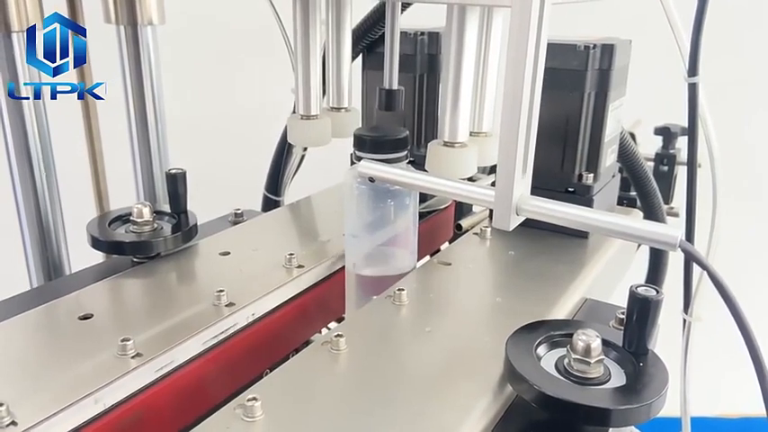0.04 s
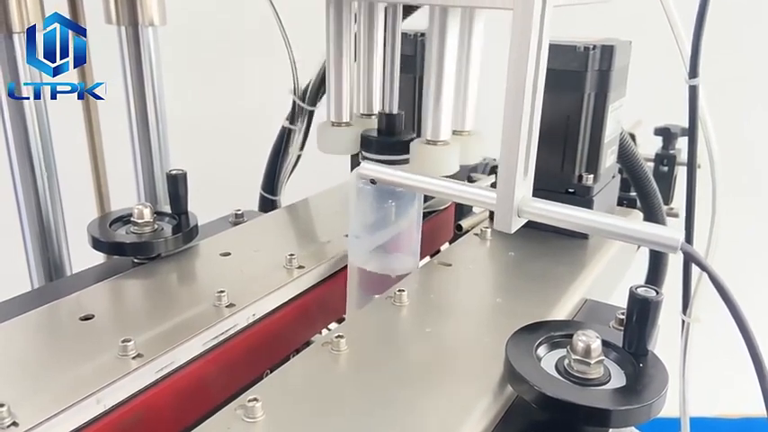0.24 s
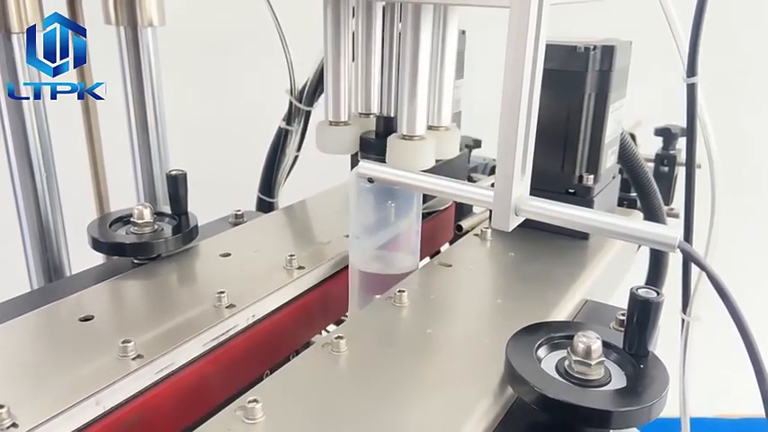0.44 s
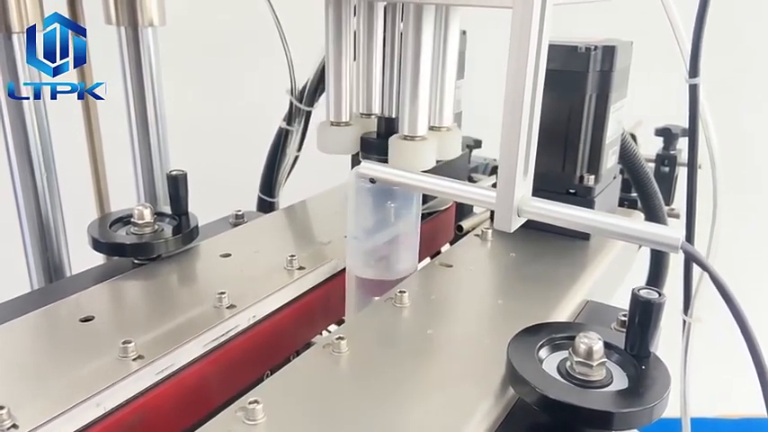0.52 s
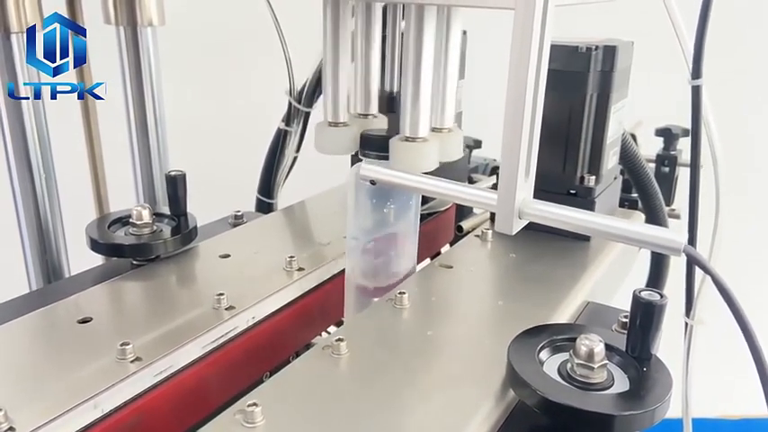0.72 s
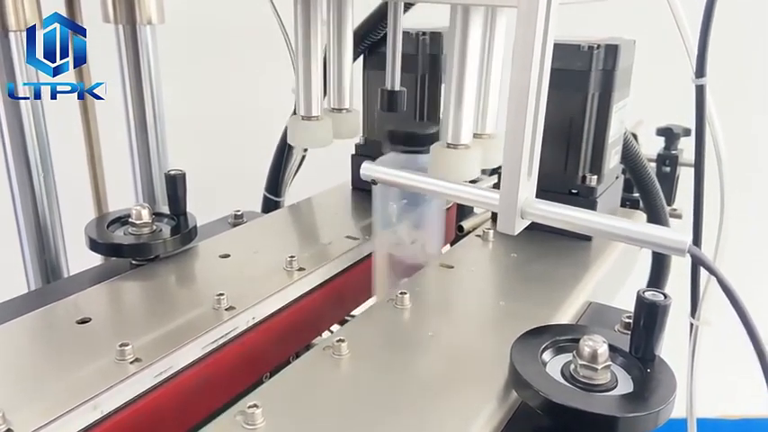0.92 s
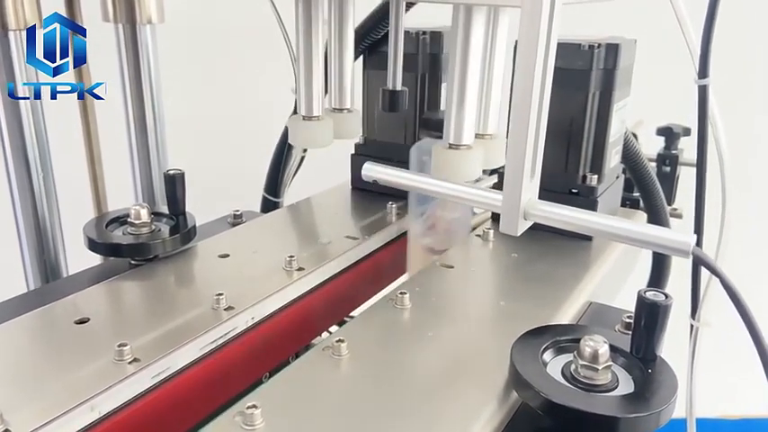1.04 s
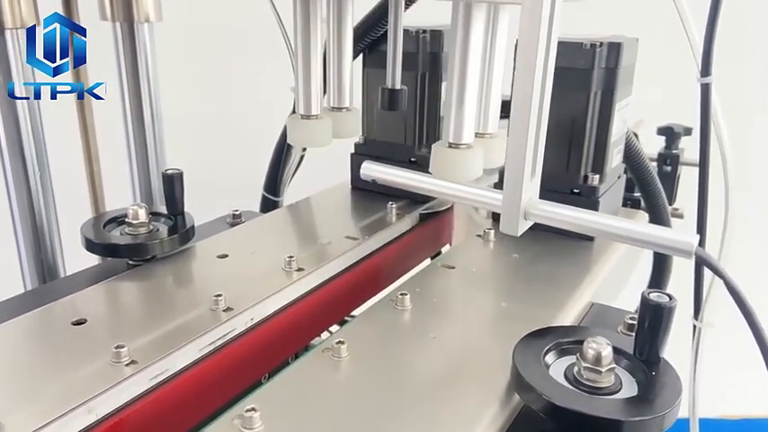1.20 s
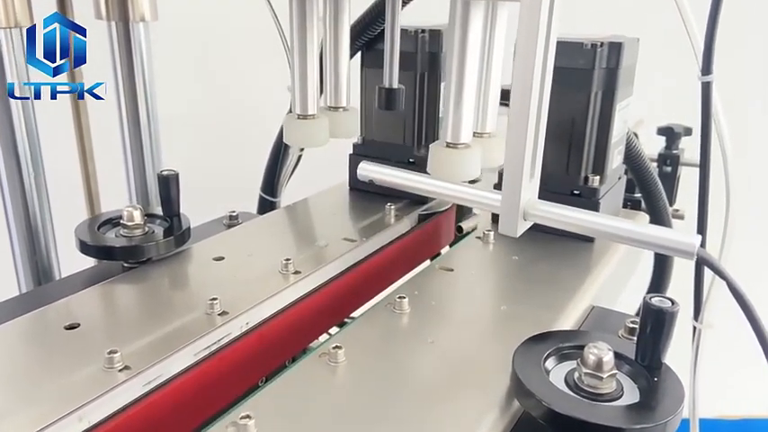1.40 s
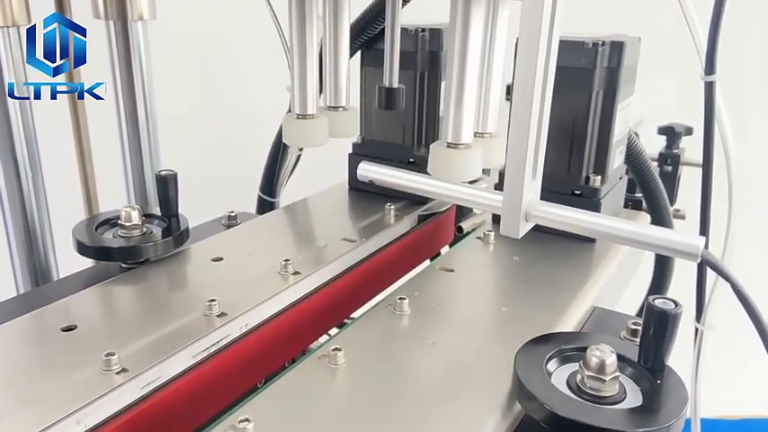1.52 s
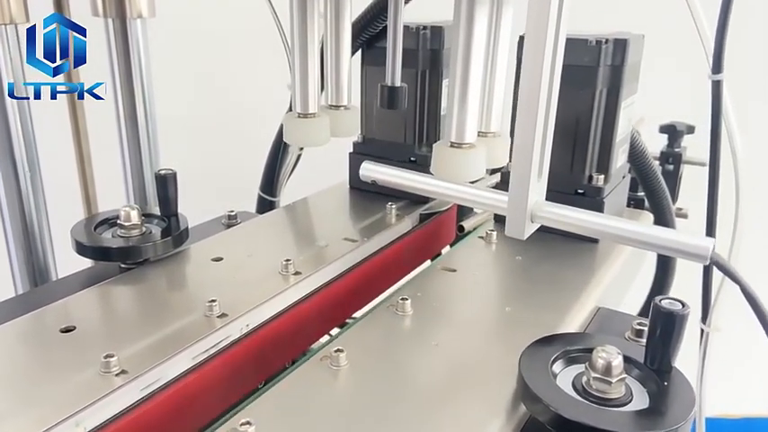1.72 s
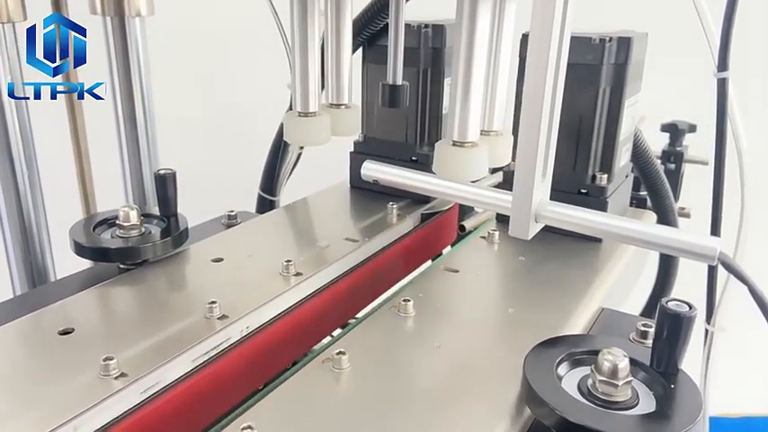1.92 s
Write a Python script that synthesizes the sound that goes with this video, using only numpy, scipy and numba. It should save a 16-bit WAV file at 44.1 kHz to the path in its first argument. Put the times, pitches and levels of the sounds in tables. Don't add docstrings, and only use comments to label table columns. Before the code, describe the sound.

A capping machine clanks, hisses air and rattles on a cap, then distant wooden knocks follow

```python
import sys
import numpy as np
from scipy import signal
from scipy.fft import rfft, irfft
from scipy.io import wavfile
from scipy.ndimage import uniform_filter1d
from numba import njit

SR = 44100
rng = np.random.default_rng(int(sys.argv[2]) if len(sys.argv) > 2 else 0)


def nominal_scale(level):
    x = np.asarray(level, float) / 20
    return 10 ** x


def transcribe(u):
    v = np.clip(np.atleast_2d(u).T, -1, 1)
    q = np.round(v * 32767).astype(np.int16)
    wavfile.write(sys.argv[1], SR, q)


N = 85995


def curve(table):
    table = np.array(table)
    hz = np.fft.rfftfreq(N, 1 / SR)
    return np.interp(np.log(hz + 1), np.log(table[:, 0]), table[:, 1])


def unit(x):
    return x / np.sqrt(np.mean(x ** 2))


def walk(rate_hz):
    k = int(SR / rate_hz)
    held = np.repeat(rng.standard_normal(N // k + 1), k)
    return 1.22 * uniform_filter1d(uniform_filter1d(held, k), k)[:N]


def hiss(table, flicker_db, rate_hz):
    spec = rfft(rng.standard_normal(N)) * nominal_scale(curve(table))
    octave = np.log2(np.fft.rfftfreq(N, 1 / SR) + 1)
    out = np.zeros(N)
    for centre in range(4, 15):
        band = irfft(spec * np.clip(1 - abs(octave - centre), 0, 1), N)
        out += band * nominal_scale(flicker_db * walk(rate_hz))
    return unit(out)


def gate(start_s, length_s, attack_s, release_s):
    out, a = np.zeros(N), int(start_s * SR)
    t = np.arange(min(N - a, int((length_s + 9 * abs(release_s)) * SR))) / SR
    rise = np.clip(t / max(attack_s, 1e-4), 0, 1)
    out[a:a + len(t)] = rise * np.exp(-np.clip(t - length_s, 0, None) / max(release_s, 1e-3))
    return out


def ring(x, hz, t60_s):
    pole = np.exp(2j * np.pi * hz / SR - np.log(1000) / (t60_s * SR))
    return signal.lfilter([1], [1, -pole], x).imag


def strike(rough, contact_s, hz, t60_s):
    push = rough * np.exp(-np.arange(len(rough)) / SR / max(contact_s, 1e-4))
    x = ring(push, hz, t60_s)
    return x / abs(x).max()


def add(out, start_s, x):
    a = int(start_s * SR)
    out[a:a + len(x)] += x[:N - a]


# f/Hz, density/dB
PLANT_SPECTRUM = [(25, -21), (60, 0.5), (350, -9), (713, -14.5), (1600, -21), (2800, -26.5), (3400, -32.5),
                  (12400, -47.5)]


def plant():
    noise_db, hum_db, hum_hz, hum_width_hz = -35, -41.5, 138.4, 8.5
    start_s, start_db, start_cutoff_hz = 0.059, -5.5, 4550
    hum = unit(ring(rng.standard_normal(N), hum_hz, 1.9 / hum_width_hz))
    rise = nominal_scale(start_db * (1 - gate(start_s, 9, 0.023, 1)))
    noise = hiss(PLANT_SPECTRUM, 2.35, 11.35)
    bright = gate(start_s, 9, 0.006, 1)
    dull = signal.sosfilt(signal.butter(2, start_cutoff_hz, fs=SR, output="sos"), noise)
    return rise * (nominal_scale(noise_db) * (bright * noise + (1 - bright) * dull) + nominal_scale(hum_db) * hum)


# t/s, length/s, attack/s, release/s, level/dB
AIR_BURSTS = [(.08, 0.033, 0.0012, 0.039, -37.5), (0.104, 0.029, 0.019, 0.037, -26),
              (0.142, 0.0027, 0.00086, 0.014, -27.5), (0.149, .18, 0.044, 0.047, -27),
              (0.232, 0.0067, .001, 0.022, -21), (0.45, 0.012, 0.0027, .01, -33.5),
              (0.576, 0.0084, 0.0019, 0.01, -32), (0.644, 0.013, 0.0028, 0.013, -30.5),
              (.697, .004, .001, 0.011, -29.5), (0.728, 0.0054, .001, .006, -19),
              (0.7422, .013, .001, 0.011, -21.5), (0.791, 0.0028, .001, 0.0091, -28),
              (0.817, 0.046, 0.0052, .012, -27), (0.822, 0.0032, .0007, 0.0091, -26.5),
              (0.867, 0.0049, .0007, 0.0065, -21), (0.882, 0.01, 0.0004, .01, -23.5),
              (0.896, 0.084, .02, .04, -50)]
# f/Hz, density/dB
JET_SPECTRUM = [(150, -22), (300, 0.5), (892, 1), (1800, -3.5), (4040, -1.5), (5300, -3), (7190, -5),
                (12400, -10)]


def air():
    spits_per_s, scatter_db, spit_share = 2600, 5.5, 0.44
    chance = rng.random((2, N))
    spit = (chance[0] < spits_per_s / SR) * nominal_scale(-scatter_db * np.log(chance[1] + .03))
    spit = unit(uniform_filter1d(spit, size=30))
    flow = sum(nominal_scale(db) * gate(s, n, a, r) for s, n, a, r, db in AIR_BURSTS)
    return flow * hiss(JET_SPECTRUM, 0.62, 58.4) * (1 - spit_share + spit_share * spit)


# t/s, length/s, attack/s, release/s, level/dB
GUIDE_CHATTER = [
    (.081, .012, .002, .01, -38),
    (.17, .16, .04, .015, -29),
    (.743, .014, .002, .008, -27),
    (.826, .03, .003, .01, -29),
    (.93, .09, .03, .03, -43),
    (1.11, .04, .01, .015, -45),
]


def rattle():
    pings_per_s, scatter_db = 1500, 2
    centre_hz, log_spread, t60_s = 3894, 0.197, 0.016
    on = sum(nominal_scale(db) * gate(s, n, a, r) for s, n, a, r, db in GUIDE_CHATTER)
    chance = rng.random((3, N))
    ticks = (chance[0] < pings_per_s / SR) * nominal_scale(-scatter_db * np.log(chance[1] + .03))
    pick = (chance[2] * 8).astype(int)
    pitches_hz = centre_hz * np.exp(log_spread * np.linspace(-1.5, 1.5, num=8))
    return on * unit(sum(ring(ticks * (pick == k), hz, t60_s) for k, hz in enumerate(pitches_hz)))


# t/s, peak level/dB, f/Hz, t60/s
STOP_HITS = [(0.081, -32, 720, .03), (0.1062, -23.5, 2550, 0.061), (.1392, -12, 2088, 0.019),
             (0.1405, -17, 2970, 0.0087), (.143, -14, 604, 0.056), (.1445, -30, 830, 0.032),
             (.181, -17.5, 2600, 0.053), (.232, -9.5, 2339, 0.039), (.236, -19, 706, 0.11),
             (.24, -21, 319, 0.11), (.262, -10.5, 2348, 0.025), (.268, -21.5, 321, 0.071),
             (.327, -22, 3320, .012), (0.335, -22, 2490, .03), (.407, -24.5, 710, .03),
             (.498, -30, 1800, 0.03), (.52, -25, 660, .09), (.577, -25, 2100, 0.027),
             (0.76, -27, 2640, .04), (0.6982, -22.5, 2500, .025), (0.731, -22, 2970, 0.01),
             (0.736, -21.5, 1320, .02), (.743, -12, 4040, .012), (.751, -17, 300, 0.1),
             (.791, -19, 1180, 0.0076), (0.8247, -14.5, 4410, 0.0083), (.825, -23.5, 1000, 0.021),
             (.829, -18.5, 339, 0.14), (.835, -15.5, 4400, 0.01), (0.8694, -12, 5530, 0.0061),
             (.872, -18.5, 2960, 0.008), (.873, -16.5, 4900, 0.033), (0.884, -16.5, 3300, 0.005),
             (.902, -28.5, 2570, .04), (1.005, -42, 3360, .01), (0.69, -34, 3600, .01),
             (1.055, -36, 1100, .03), (1, -33, 3500, 0.0072), (1.2, -41, 3450, 0.0083)]


def stops():
    contact_s, partner_ratio, partner_db = 0.00078, 1.56, -11
    crack_db, crack_s = -4, 0.0042
    noise, out = hiss(JET_SPECTRUM, 3.0, 61.56), np.zeros(N)
    roughs = rng.standard_normal((len(STOP_HITS), 6000))
    for (s, db, hz, t60), rough in zip(STOP_HITS, roughs):
        main = strike(rough, contact_s, hz, t60)
        partner = strike(rough, contact_s, hz * partner_ratio, t60 * 0.24)
        add(out, s, nominal_scale(db) * (main + nominal_scale(partner_db) * partner))
        out += nominal_scale(db + crack_db) * min(hz / 2500, 1) * gate(s, 0, 0.00046, crack_s) * noise
    return out


# t/s, rise/s, level/dB, f/Hz, t60/s
FRAME_JOLTS = [(0.102, 0.026, -28, 46.3, 0.35), (.103, .0055, -19, 78.3, 0.14),
               (0.171, 0.0059, -24, 82.2, 0.46), (.245, 0.046, -14.5, 89.66, 0.34),
               (.331, .023, -26, 48, 0.52), (0.408, 0.031, -26, 89.2, 0.51), (.5, .024, -29, 89.2, 0.34),
               (0.687, .011, -19.5, 68.7, 0.19), (0.761, 0.025, -28, 74, 0.23),
               (.835, 0.035, -15, 83.7, 0.28), (0.839, 0.018, -28, 149, 0.23), (.89, .02, -31.5, 214, 0.42),
               (.9, .008, -27.5, 312.7, 0.13), (.905, .016, -17, 71.3, 0.19),
               (0.93, 0.014, -24, 48.6, 0.45), (0.959, 0.038, -35, 139.5, 0.84),
               (1.0, .06, -26, 66.5, 0.56), (1.081, 0.02, -19.5, 68, 0.19), (1.09, 0.018, -37, 235, 0.22),
               (1.211, 0.014, -28.5, 58.8, 0.37), (1.309, 0.0058, -35, 427, 0.086),
               (1.329, 0.024, -30, 61, .25), (1.421, .011, -31, 57.7, 0.22), (1.56, .03, -36, 73.4, 0.29),
               (1.779, 0.024, -37.5, 64.6, 0.25), (1.88, .03, -34, 73.7, 0.24)]


def frame():
    t = np.arange(N) / SR
    out = np.zeros(N)
    for s, rise, db, hz, t60 in FRAME_JOLTS:
        swell = gate(s, rise, rise, t60 / np.log(1000))
        out += nominal_scale(db) * np.sqrt(2) * swell * np.sin(2 * np.pi * hz * (t - s))
    return out


# t start/s, t stop/s, attack/s, release/s, level/dB
SPINDLE_RUN = (0.11, 0.8155, -0.35, 0.2041, -29.5)
# f/Hz, level/dB, t60/s
HOUSING_MODES = [(2385, -6, .07), (2500, -8, 0.065), (2575, -6, .07), (2624, -4, 0.04),
                 (2110, -14.5, 0.073), (4250, -16, 0.025), (6270, -9.5, 0.054), (6640, -9, 0.014),
                 (3680, -21.5, .022)]
# t start/s, t stop/s, attack/s, release/s
WHIR_RUN = (0.11, 0.91, 0.19, 0.15)
# f/Hz, density/dB
WHIR_SPECTRUM = [(60, -56), (120, -3.5), (1360, -7), (2630, -10.5), (4000, -14), (7340, -15), (10800, -25),
                 (12400, -21.5)]


def spindles():
    turn_hz, throb_db, teeth_per_s, tooth_scatter_db, whir_db = 24.64, 1.5, 3300, 3, -33.5
    start, stop, attack, release, db = SPINDLE_RUN
    on = gate(start, stop - start, attack, release)
    t = np.arange(N) / SR
    throb = nominal_scale(throb_db * np.cos(2 * np.pi * turn_hz * (t - .498)) + 0.53 * walk(29.4))
    chance = rng.random((3, N))
    teeth = (chance[0] < teeth_per_s / SR) * np.sign(chance[1] - .5)
    teeth = teeth * nominal_scale(-tooth_scatter_db * np.log(chance[2] + .03))
    push = teeth * throb * on
    body = sum(nominal_scale(g) / np.sqrt(t60) * ring(push, hz, t60) for hz, g, t60 in HOUSING_MODES)
    start, stop, attack, release = WHIR_RUN
    whir = gate(start, stop - start, attack, release) * throb ** 0.2 * hiss(WHIR_SPECTRUM, 2.5, 25.2)
    return nominal_scale(db) * unit(body) * 0.51 + nominal_scale(whir_db) * whir


# t/s, length/s, f start/Hz, f end/Hz, level/dB
MOTOR_SAG = (.135, .16, 220, 172, -36)


def motor():
    s, n, hz0, hz1, db = MOTOR_SAG
    hz = np.interp(np.arange(N) / SR, [s, s + n], [hz0, hz1])
    tone = np.sin(2 * np.pi * np.cumsum(hz) / SR)
    return nominal_scale(db + 3 + 2 * walk(23.0)) * gate(s, n, 0.016, 0.045) * tone


# t/s, peak level/dB, brightness/(dB/octave), pitch factor
FAR_KNOCKS = [
    (1.272, -25, 1, 1.01),
    (1.401, -20.5, 1.5, 0.97),
    (1.621, -26, 2.5, 1.1),
    (1.717, -37, -1, .85),
    (1.733, -22, -1, .9),
    (1.821, -23.5, 0, 1),
    (1.874, -40, 5, 1.2),
]
# f/Hz, level/dB, t60/s
BOX_MODES = [(872, 0, 0.034), (647, -11.5, 0.1), (761, -2.5, 0.093), (1082, -11, .06), (1287, -14.5, 0.076),
             (1560, -10, 0.058), (1746, -13, 0.044), (2174, -14.5, 0.052), (2500, -13, 0.029)]


def knocks():
    modes_db, thud_db, scatter_db, contact_s = -5.5, -10, 0.5, 0.0026
    echo_s, echo_db = .018, -5
    chance, out = rng.standard_normal((len(FAR_KNOCKS), len(BOX_MODES), 2)), np.zeros(N)
    roughs = rng.standard_normal((len(FAR_KNOCKS), 6000))
    for (s, db, bright_db, pitch), row, rough in zip(FAR_KNOCKS, chance, roughs):
        soft = uniform_filter1d(rough, size=8)
        for late_s, late_db, push in (0, 0, soft), (echo_s, echo_db, soft[::-1]):
            hit = nominal_scale(thud_db) * strike(push, 0.018, 900, 0.0057)
            for (hz, g, t60), c in zip(BOX_MODES, row):
                mode_db = modes_db + g + bright_db * np.log2(hz / 800) + scatter_db * c[0]
                hit = hit + nominal_scale(mode_db) * strike(push, contact_s, hz * pitch * (1 + 0.023 * c[1]), t60)
            add(out, s + late_s, nominal_scale(db + late_db) * hit)
    return out


@njit
def walls(x, lags, gain, damp):
    line, soft, out = np.zeros((8, 8192)), np.zeros(8), np.zeros((2, len(x)))
    for i in range(len(x)):
        total = 0.
        for k in range(8):
            soft[k] += (1 - damp) * (gain[k] * line[k, (i - lags[k]) & 8191] - soft[k])
            total += soft[k]
            out[k % 2, i] += soft[k] * (1 - (k & 2))
        for k in range(8):
            line[k, i & 8191] = x[i] + soft[k] - total / 4
    return out


def smear():
    strength = 0.39
    lags_samples = np.array([[37], [83], [151]])
    late = np.exp(-2j * np.pi * np.fft.rfftfreq(N) * lags_samples)
    return np.prod((strength + late) / (1 + strength * late), axis=0)


# f/Hz, level/dB
MID_RESPONSE = [(4700, -0.5), (5300, -5), (5900, -0.5), (8200, -1), (8350, -22), (9600, -19), (9800, -0.5),
                (10700, 0.5)]
# f/Hz, level/dB
SIDE_RESPONSE = [(60, -28.5), (640, -5.5), (1500, 0), (3500, -7), (5300, -3.5), (7000, -13.5), (8200, -1),
                 (10000, 4.5)]


def scene():
    hall_t60_s, hall_damp, hall_db, left_lean = 1.41, 0.31, -16.5, 0.087
    spin_wet_db, knock_wet_db, low_wet_db = -15, -4, -1
    steady = plant()
    near = air() + rattle() + stops() + motor()
    low, spin, far = frame(), spindles(), knocks()
    lags = rng.integers(700, 2800, 8)
    wet = nominal_scale(spin_wet_db) * spin + near + nominal_scale(knock_wet_db) * far + nominal_scale(low_wet_db) * low
    hall = nominal_scale(hall_db) * walls(wet, lags, nominal_scale(-60 * lags / SR / hall_t60_s), hall_damp)
    direct = spin + near + low + far + steady
    hz = np.fft.rfftfreq(N, 1 / SR)
    mid = rfft(direct + hall[0]) * nominal_scale(curve(MID_RESPONSE))
    side = (rfft(direct) * smear() + rfft(hall[1])) * nominal_scale(curve(SIDE_RESPONSE))
    side = side + left_lean * mid * (hz > 450) * (hz < 6500)
    return irfft(np.array([mid + side, mid - side]), N)


def low_pass(x):
    return signal.sosfilt(signal.butter(12, 12890, fs=SR, output="sos"), x)


def record(dry):
    top_hz, side_top_hz = 11570, 10200
    hz = np.fft.rfftfreq(N, 1 / SR)
    mid = irfft(rfft(dry[0] + dry[1]) / 2 / (1 + (hz / top_hz) ** 60), N)
    side = irfft(rfft(dry[0] - dry[1]) / 2 / (1 + (hz / side_top_hz) ** 40), N)
    return low_pass(np.array([mid + side, mid - side]))


dry = scene()
out = record(dry)
transcribe(out)
```